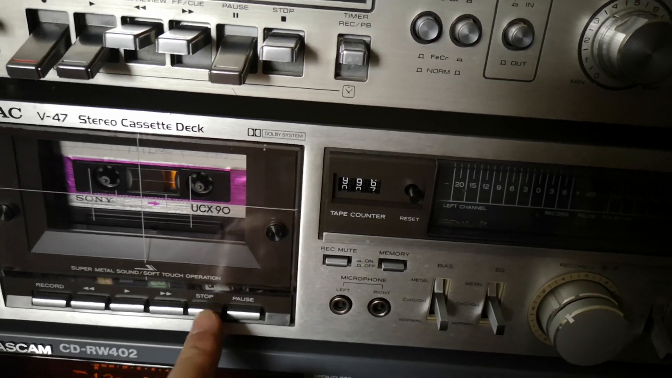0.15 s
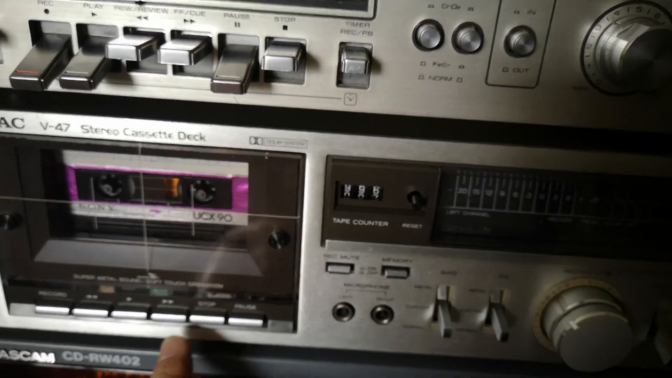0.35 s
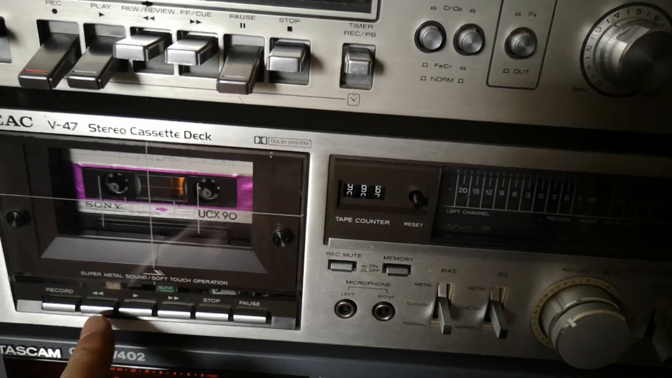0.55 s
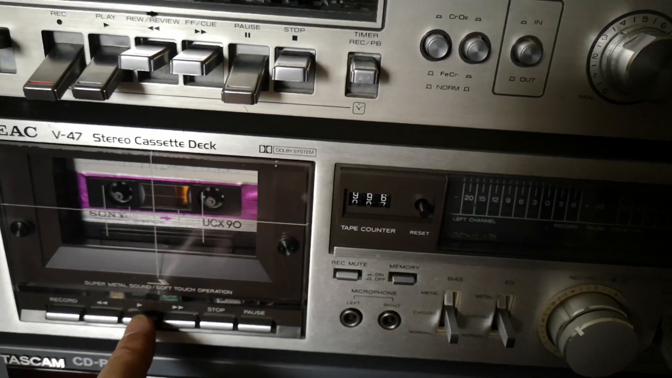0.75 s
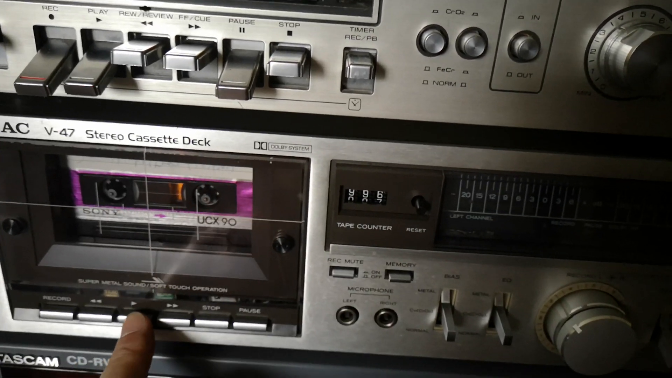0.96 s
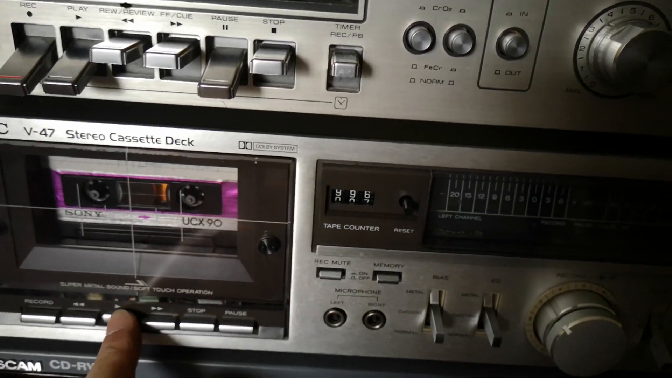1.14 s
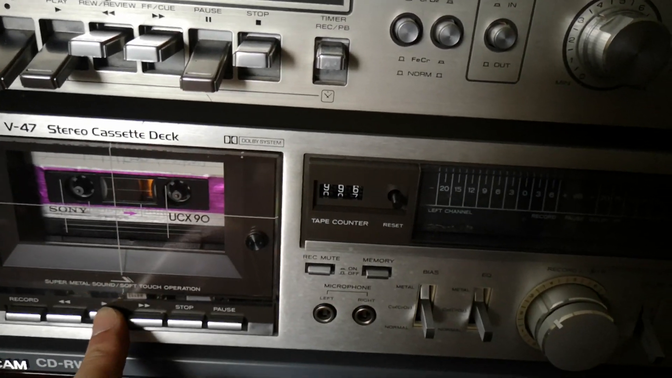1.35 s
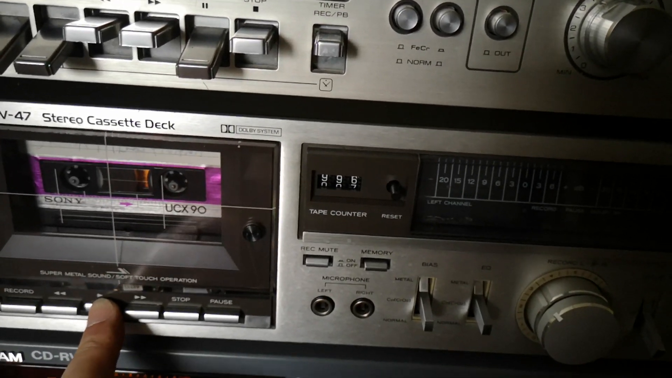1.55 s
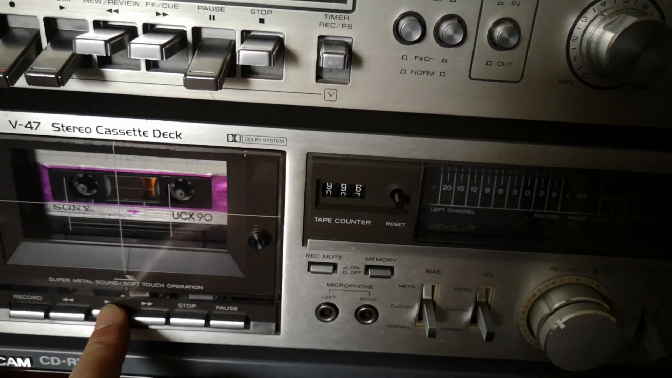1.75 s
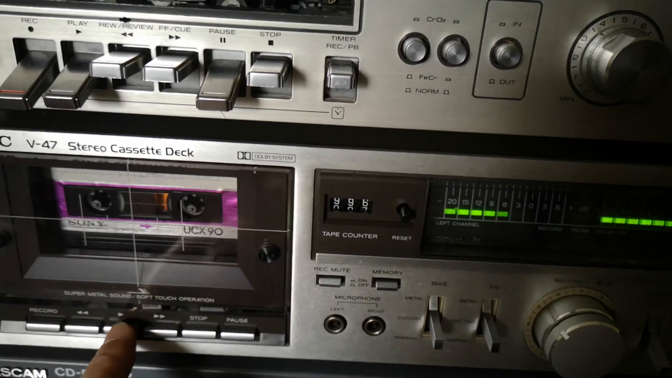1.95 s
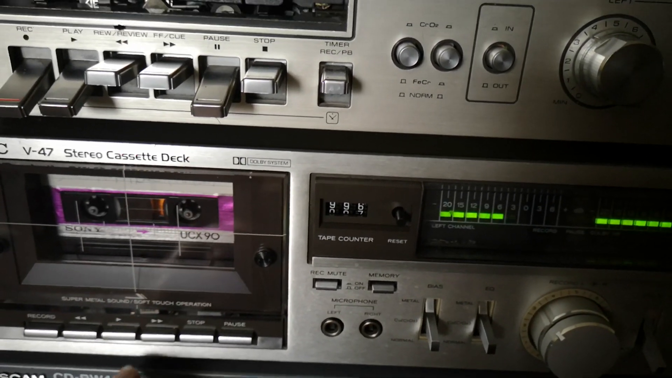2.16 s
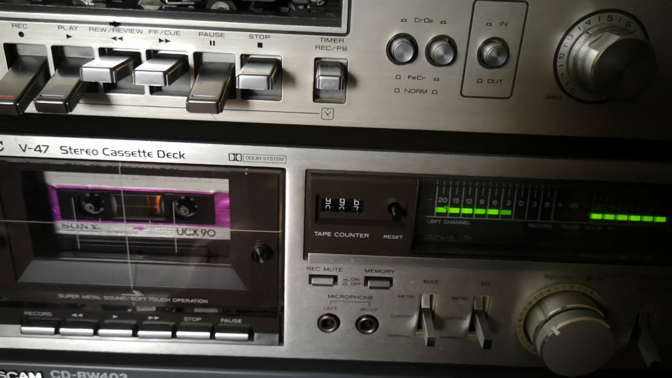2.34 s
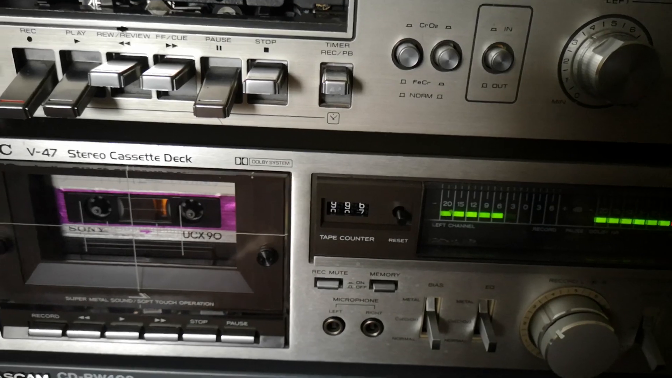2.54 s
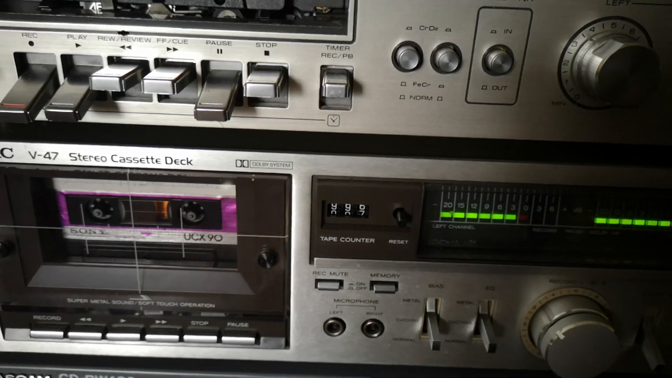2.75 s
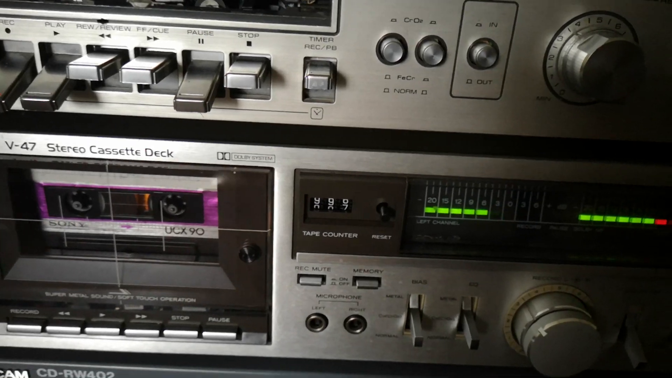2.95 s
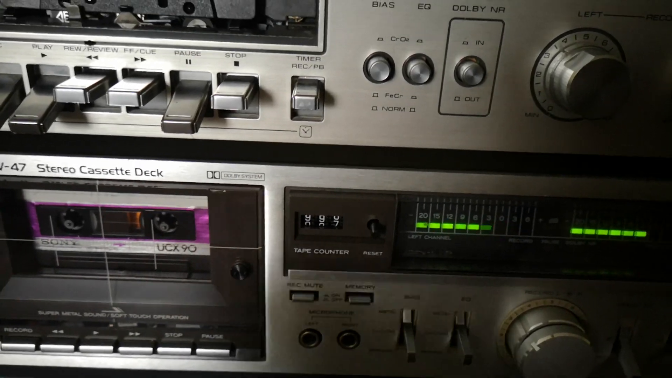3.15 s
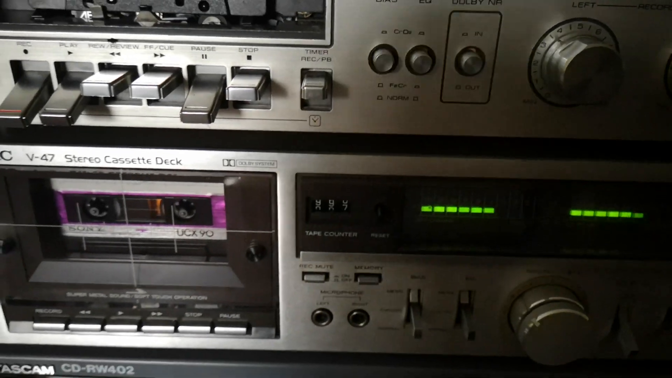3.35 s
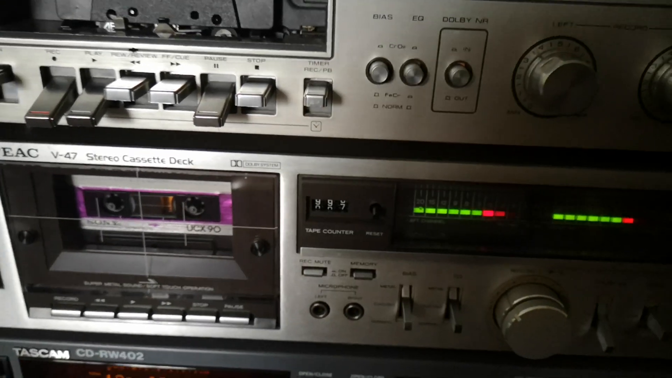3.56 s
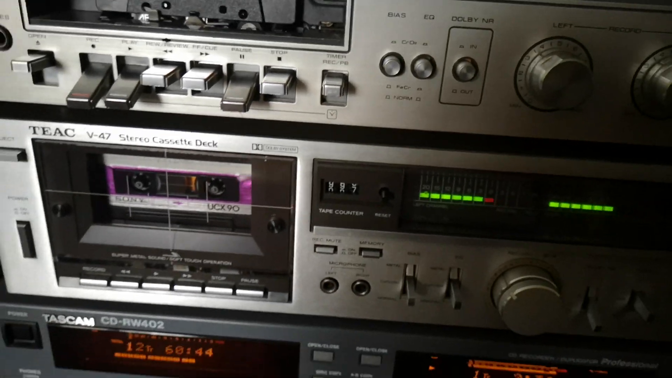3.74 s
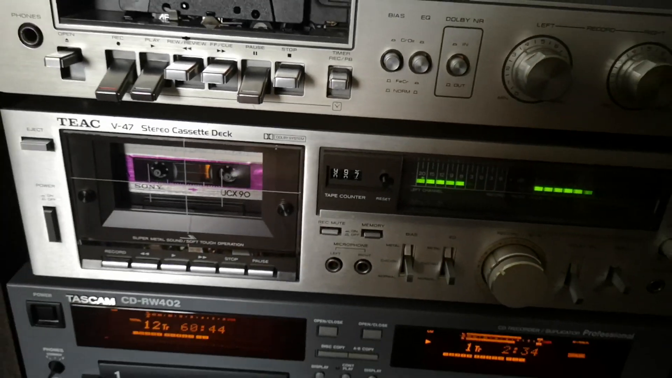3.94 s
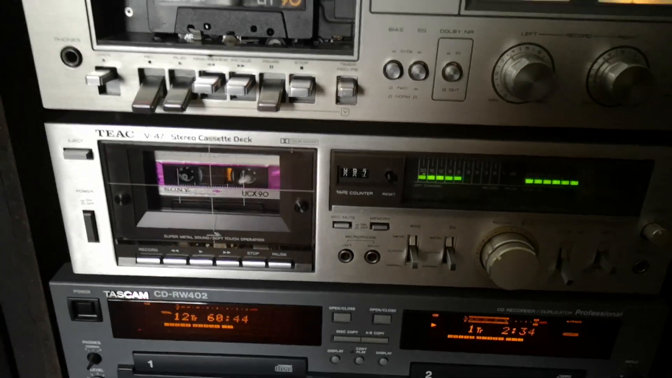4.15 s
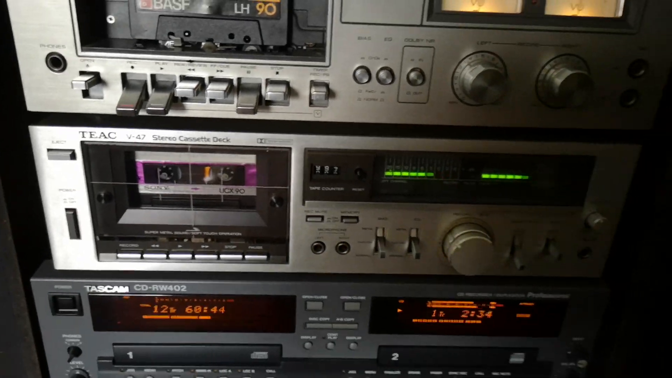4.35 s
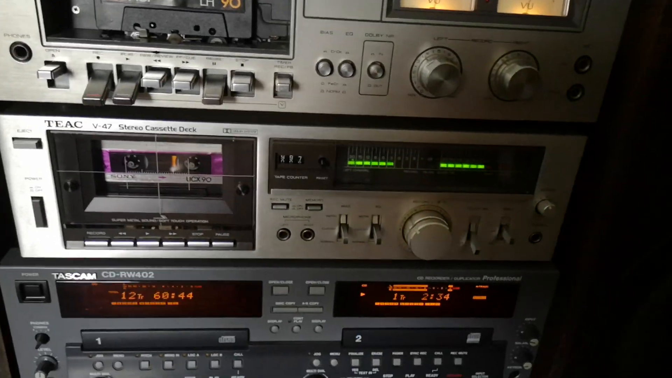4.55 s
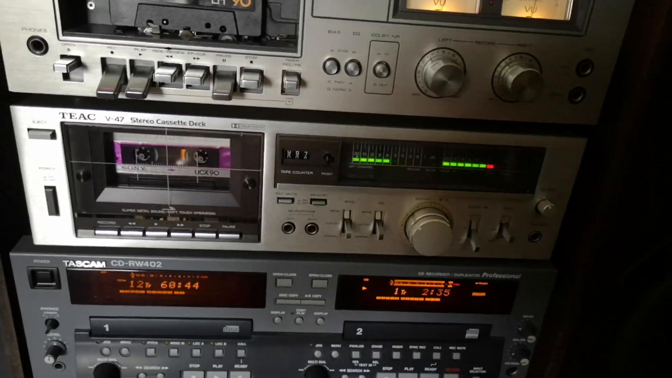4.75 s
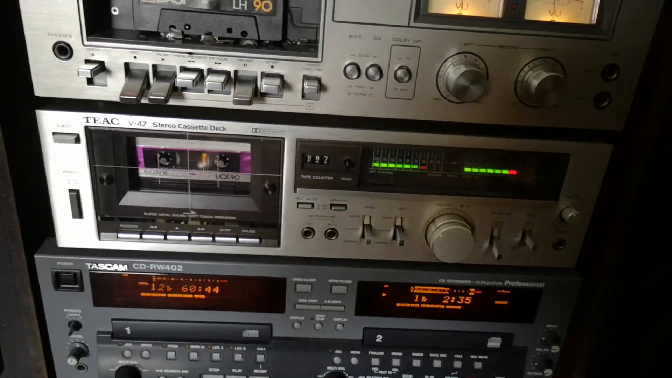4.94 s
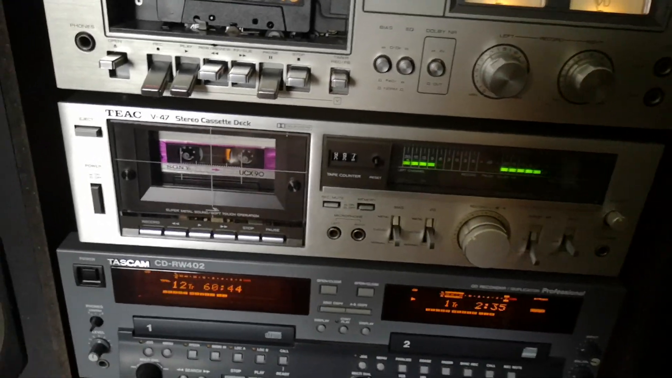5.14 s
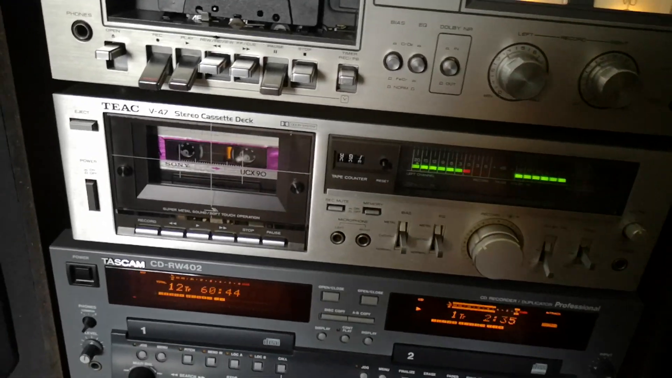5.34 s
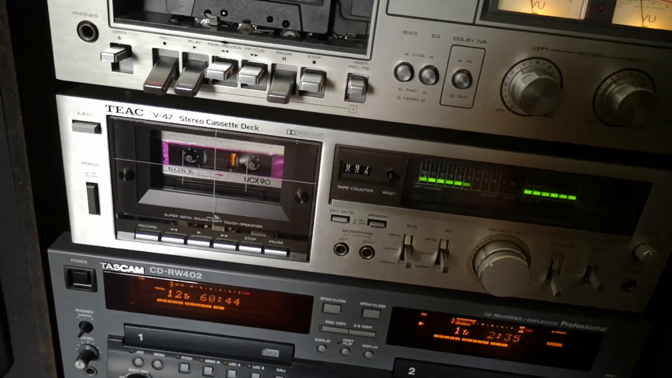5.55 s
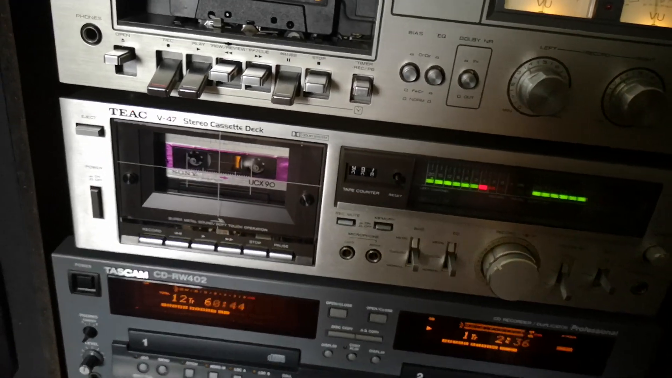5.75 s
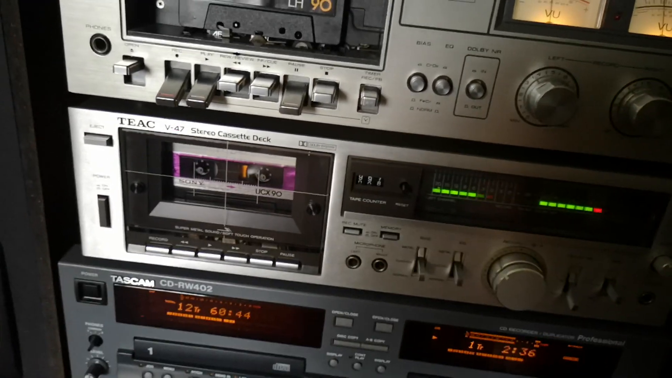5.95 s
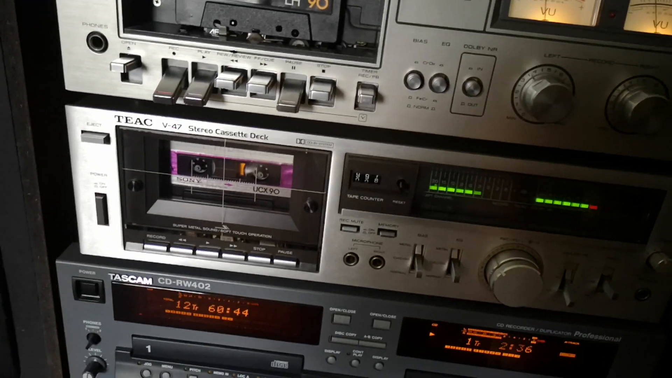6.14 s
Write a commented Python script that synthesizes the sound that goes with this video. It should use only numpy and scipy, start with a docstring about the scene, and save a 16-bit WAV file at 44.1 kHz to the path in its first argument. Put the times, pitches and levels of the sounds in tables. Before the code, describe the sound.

Keys on a cassette deck clack and thump up close, with brief tape winding, then light ticks over faint hum and hiss.

```python
"""Cassette deck keys, up close

Stop, wind and play are pressed. In each stroke a latch lets go and a lever rattles along its travel
and hits its stop: the front clacks, the cabinet thumps. The reels whirr while the tape winds.
Mains hum and soft hiss fill a small quiet room; later a hand-held camera's case ticks in the hand."""
import sys
import numpy as np
from scipy import signal
from scipy.fft import rfft, irfft
from scipy.io import wavfile

SR = 44100
rng = np.random.default_rng(int(sys.argv[2]) if len(sys.argv) > 2 else 0)


def master(y):
    """Save y as 16-bit WAV."""
    cut = np.clip(np.atleast_2d(y).T, -1, 1)
    pcm = np.round(cut * 32767)  # scale
    wavfile.write(sys.argv[1], SR, pcm.astype(np.int16))


N = 273243


def amp(db):
    """Decibels to gain."""
    return 10 ** (np.asarray(db) / 20)


def unit_rms(x):
    """Scales to rms 1."""
    return x / np.sqrt(np.mean(x ** 2) + 1e-20)


def curve_at(points, hz):
    """Reads a curve on a log-frequency axis."""
    point_hz, value = np.transpose(points)
    return np.interp(np.log(hz + 1), np.log(point_hz + 1), value)


def add(mix, start_s, sound):
    """Lays a sound into the stereo mix."""
    part = mix[:, round(start_s * SR):][:, :sound.shape[-1]]
    part += sound[..., :part.shape[-1]]


def pan(pan_db):
    """Stereo gains for a left minus right level."""
    return amp([[pan_db / 2], [-pan_db / 2]])


def bell(hz, centre_hz, octaves):
    """A rounded hump in dB with straight skirts: the band that one contact excites."""
    return 12 * (1 - np.sqrt(1 + (np.log2((hz + 1) / centre_hz) / octaves) ** 2))


def colour(x, curve_db, size=2048):
    """Minimum-phase EQ of unit energy; the curve is a function of Hz."""
    log_gain = np.log(amp(curve_db(abs(np.fft.fftfreq(size, 1 / SR)))))
    taps = np.fft.ifft(np.exp(np.conj(signal.hilbert(log_gain)))).real
    return signal.oaconvolve(x, taps[None] / np.linalg.norm(taps), axes=1)[:, :x.shape[1]]


def decay(t, t60):
    """Falls by 60 dB in t60 seconds."""
    return np.exp(-np.log(1000) * t / t60)


def rattle(t, t60, likeness):
    """A contact's dense, dying chatter, partly shared by left and right."""
    shared, *own = rng.choice([-1., 1.], (3, len(t)))
    return (np.sqrt(likeness) * shared + np.sqrt(1 - likeness) * np.array(own)) * decay(t, t60)


# Decay of the small room: band_hz, t60_s
ROOM_DECAY = [(100, .35), (500, 0.28), (1000, 0.18), (1800, 0.19), (3000, 0.18), (6000, 0.19), (9000, 0.17),
              (15000, 0.21)]
def room(x, build_s=0.0023, density=.12):
    """Sparse reflections that build up quickly and die band by band."""
    t = np.arange(SR // 2) / SR
    echoes = rng.choice([-1., 1.], (2, len(t))) * (rng.random((2, len(t))) < density)
    echoes *= 1 - np.exp(-(t / build_s) ** 2)
    hz, frame_s, bands = signal.stft(echoes, SR, nperseg=256)
    bands = bands * decay(frame_s, curve_at(ROOM_DECAY, hz)[:, None])
    tail = signal.istft(bands, SR, nperseg=256)[1]
    return signal.fftconvolve(x, tail / np.linalg.norm(tail[0]), axes=1)[:, :N]


# Tone of the room hiss: band_hz, gain_db
HISS_EQ = [(20, -4.5), (45, -11), (85, -15), (170, -16), (270, -22), (400, -27), (630, -31.5), (950, -27.5),
           (1900, -24.5), (4400, -37), (7000, -39.5), (8800, -44), (11500, -44), (15800, -47)]
# Stereo image of the hiss: band_hz, left_right_correlation
HISS_LIKENESS = [(30, 0.88), (200, 0.93), (500, 0), (1000, 0.12), (3000, 0), (15000, 0)]
def room_hiss(level_db=-65):
    """A steady bed of noise, centred in the lows and wide above."""
    hz = np.fft.rfftfreq(N, 1 / SR)
    left, other = rfft(rng.standard_normal((2, N)))
    likeness = curve_at(HISS_LIKENESS, hz)
    right = likeness * left + np.sqrt(1 - likeness ** 2) * other
    hiss = irfft(np.array([left, right]) * amp(curve_at(HISS_EQ, hz)), N)
    return amp(level_db) * unit_rms(hiss)


# Tones of the hum: pitch_hz, gain_db
HUM_TONES = [(120.1, 0), (238, -14.5), (180, -21.5), (948, -23), (1287, -23.5), (5765, -34.5)]
# Level ride of the hum as the camera moves about: time_s, level_db
HUM_RIDE = [(0.0, -62.5), (0.83, -63.5), (0.98, -65), (3.47, -64.5), (5.44, -68), (5.59, -64.5),
            (6.2, -67.5)]
def mains_hum():
    """A transformer hums on steady pitches while its level drifts."""
    t = np.arange(N) / SR
    hum = sum(amp(db) * np.sqrt(2) * np.sin(2 * np.pi * (hz * t + rng.random())) for hz, db in HUM_TONES)
    return hum * amp(np.interp(t, *np.transpose(HUM_RIDE)))


# Dry ticks of the camera's case: start_s, energy_db, centre_hz, width_octaves, t60_s, pan_db
CASE_TICKS = [(3.0231, -39, 2400, .6, 0.0095, -0.5), (3.822, -18.5, 1680, 0.42, 0.0039, 16.5),
              (3.822, -33, 4800, 0.5, 0.0032, 16), (4.0397, -38, 7240, 0.45, 0.017, 26),
              (4.0432, -33.5, 770, 0.38, 0.011, 16.5), (4.0451, -30, 2410, 0.61, 0.0071, 20),
              (4.309, -37, 10000, 1.5, 0.0032, -7), (4.371, -40.5, 3500, 1, .0077, 19),
              (4.5015, -26.5, 1104, 1.01, 0.0096, -9), (4.5029, -38.5, 4400, 0.19, .0027, 17),
              (4.6146, -26.5, 3550, 0.9, 0.0055, 17), (4.8504, -38.5, 2300, .36, 0.0097, -9.5)]
def case_ticks(crack=0.33):
    """One clean crack, then a little chatter; the small stiff shell gives out little bass."""
    t, out = np.arange(SR // 4) / SR, np.zeros((2, N))
    for start_s, db, centre_hz, octaves, t60, pan_db in CASE_TICKS:
        chatter = rattle(t, t60, likeness=0.42)
        slip = crack * (t == 0) + chatter / np.linalg.norm(chatter[0])
        tick = colour(slip, lambda hz: bell(hz, centre_hz, octaves)
                      - 10 * np.log10(1 + (950 / (hz + 100)) ** 10))  # low cut
        add(out, start_s, amp(db) * pan(pan_db) * tick / np.linalg.norm(tick, axis=1, keepdims=True))
    return out


# Faint rubs on the case, and a soft reel squeak swelling at the end:
# start_s, length_s, level_db, centre_hz
RUBS_AND_SQUEAK = [(3.686, 0.029, -57, 1900), (4.01, .14, -67.5, 1700), (4.122, 0.09, -74.5, 5540),
                   (4.318, 0.1, -74, 7000), (5.939, 0.46, -73.5, 2200)]
def rubs_and_squeak(grains_per_s=1500, octaves=.62, pan_db=9):
    """Faint, grainy friction that swells and fades."""
    out = np.zeros((2, N))
    for start_s, length_s, db, centre_hz in RUBS_AND_SQUEAK:
        grains = rng.standard_normal((2, SR)) * (rng.random(SR) < grains_per_s / SR)
        friction = unit_rms(colour(grains, lambda hz: bell(hz, centre_hz, octaves)))
        swell = np.hanning(round(length_s * SR))
        add(out, start_s, amp(db) * pan(pan_db) * swell * friction[:, :len(swell)])
    return out


# Soft bumps of the hand on the camera: start_s, level_db, pitch_hz
HAND_BUMPS = [(3.48, -55.5, 30), (3.822, -51.5, 38), (3.904, -50.5, 27.3), (4.188, -53.5, 202.3),
              (4.608, -50, 60), (5.55, -55.5, 32)]
def small_noises(room_db=-19, lag_samples=26):
    """Ticks, rubs and the squeak with a touch of room, plus dull bumps through the camera's case."""
    t = np.arange(SR // 4) / SR
    out = case_ticks() + rubs_and_squeak()
    out[1] = np.roll(out[1], lag_samples)  # these reach the left microphone first
    out += amp(room_db) * room(out)
    for start_s, db, hz in HAND_BUMPS:
        cycles = hz * t
        swell = 2 * cycles * np.exp(1 - 2 * cycles)
        add(out, start_s, amp(db) * swell * np.sin(2 * np.pi * cycles))
    return out


# Tone of the reel motor: band_hz, gain_db
MOTOR_EQ = [(40, -0.5), (120, 4.5), (210, 12.5), (270, 6), (360, -7.5), (600, -17.5), (900, -6),
            (2000, -20), (4000, -36), (12000, -42.5)]
# Runs of winding tape: start_s, stop_s, motor_db, whirr_db
WIND_RUNS = [(-.1, 0.255, -64.5, -70), (1.167, 1.63, -61.5, -86)]
def winding(spin_up_s=.02, coast_s=0.037):
    """The reel motor rumbles and the tape whirrs: both spin up quickly and coast to rest."""
    t, out = np.arange(N) / SR, np.zeros((2, N))
    motor = colour(rattle(t, np.inf, likeness=0.71), lambda hz: curve_at(MOTOR_EQ, hz))
    whirr = colour(rattle(t, np.inf, likeness=0.15), lambda hz: bell(hz, centre_hz=1900, octaves=1))
    for start_s, stop_s, motor_db, whirr_db in WIND_RUNS:
        spin_up = 1 - np.exp(-np.maximum(t - start_s, 0) / spin_up_s)
        coast = np.exp(-np.maximum(t - stop_s, 0) / coast_s)
        out += spin_up * coast * (amp(motor_db) * motor + amp(whirr_db) * whirr)
    return out


SEAT_S = .0027  # from the lever meeting its stop until it seats with a clack
# Small knocks of the winding reels: start_s, snap_db, clack_db
KNOCKS = [(1.3429, -58.5, -59), (1.4376, -64.5, -56.5)]
# Key strokes: start_s, travel_s, touch_db, release_snap_db, rattle_db, stop_snap_db,
# clack_db, clack_centre_hz, thump_db, thump_centre_hz
KEY_STROKES = [(0.179, 0.0044, -47, -27, -48, -18, -17, 2140, -30, 107.5),
               (0.2444, .0262, -60, -39.5, -40, -41.5, -35, 2550, -45, 110),
               (0.3555, 0.017, -61.5, -22.5, -25, -20.5, -17, 1180, -29, 173),
               (1.1611, .0212, -60.5, -32.5, -44, -36.5, -39.5, 925, -47, 150),
               (1.5221, .0242, -72, -63.5, -49.5, -37.5, -38, 1124, -46, 171),
               (1.6240, 0.0029, -70, -57, -49, -29, -28, 1450, -30.5, 76),
               (2.0420, 0.0089, -47.5, -33, -35, -23, -19.5, 990, -32, 206)]
def contacts(slack_s=.008, rebound_s=.007, rebound_db=-17.5, knock_hz=1280):
    """Every hit in the mechanism: start_s, clack_db, centre_hz, snap_db, clack_delay_s."""
    for start_s, travel_s, touch_db, release_db, rattle_db, stop_db, clack_db, hz, _, _ in KEY_STROKES:
        stop_s = start_s + travel_s
        yield start_s - slack_s, touch_db, hz, touch_db - 6, 0  # the key takes up its slack
        yield start_s, rattle_db, hz * 1.1, release_db, 0  # the light latch lets go, a little higher
        yield start_s + 0.55 * travel_s, rattle_db, hz, release_db - 9, 0  # the lever rattles midway
        yield stop_s, clack_db, hz, stop_db, SEAT_S  # hits its stop
        yield stop_s + rebound_s, clack_db + rebound_db, hz, stop_db + rebound_db, 0  # bounces once
    for start_s, snap_db, clack_db in KNOCKS:
        yield start_s, clack_db, knock_hz, snap_db, 0


# Low modes of the cabinet: pitch_hz, gain_db, t60_s
CABINET_MODES = [(60, -3.5, .35), (70, -3.5, 0.29), (102.7, -2.5, 0.26), (112.3, -8.5, 0.16), (162, -3, .2),
                 (187, 6, .33), (224.4, -6, 0.22), (256, -17, 0.17)]
def cabinet_thumps(rise_s=0.034, shudder_db=-9, octaves=0.81):
    """Low modes swell after each lever seats and boom on, while loose parts shudder."""
    t, out = np.arange(SR) / SR, np.zeros((2, N))
    hz, db, t60 = np.transpose(CABINET_MODES)[:, :, None]
    for start_s, travel_s, *_, thump_db, centre_hz in KEY_STROKES:
        modes = amp(db + bell(hz, centre_hz, octaves)) * decay(t, t60) * np.sin(2 * np.pi * hz * t)
        chatter = rattle(t, t60=0.24, likeness=0.49)
        shudder = colour(chatter, lambda f: bell(f, centre_hz=225, octaves=0.75))
        boom = (modes.sum(0) + amp(shudder_db) * shudder) * (1 - np.exp(-t / rise_s))
        add(out, start_s + travel_s + SEAT_S, amp(thump_db) * boom)
    return out


# Ring of the deck's front and chassis: pitch_hz, gain_db
FRONT_MODES = [(355, -7), (505, -3), (689, -3.5), (772, 1), (800, -11), (940, -5), (980, 1), (1190, -3.5),
               (1363, -2.5), (1480, -6.5), (1545, -6.5), (1780, -10.5), (1893, -7), (1997, -8.5),
               (2150, -9), (2456, -7.5), (2649, -9), (4702, -4.5), (5012, -6), (5640, -8)]
# Faint, lingering ring of the sheet-metal cover: pitch_hz, gain_db
COVER_MODES = [(1530, 0.5), (1707, -4.5), (1900, -2), (2010, -3.5), (2075, -1)]
# Tone of the bright latch snap: band_hz, gain_db
SNAP_EQ = [(200, -17), (1000, -8), (2300, -0.5), (3400, -0.5), (4900, 4), (6500, -3), (7900, -2),
           (9800, -6), (11500, -6), (15000, -17.5)]
# Tone of the dull clack: band_hz, gain_db
CLACK_EQ = [(100, -8.5), (300, -11.5), (420, -15), (700, -4.5), (950, 1), (1100, -5.5), (1400, -6),
            (2000, 6), (2500, 0), (3200, -8), (6000, -16), (15000, -26.5)]
# Stereo lean of the deck: band_hz, left_minus_right_db
DECK_PAN = [(200, 2.5), (600, -1.5), (950, -1), (1600, -6), (2400, 3.5), (3400, 6), (5000, -1), (7500, 5),
            (9500, 0.5), (11500, -9), (15000, -8)]
def key_clacks(clack_db=-2, front_db=-12, cover_db=-35.5, room_db=-8,
               crack=6.5, octaves=0.79, lag_samples=5):
    """Each hit gives a bright snap, a dense clack and the ring of the front and the cover."""
    t, out = np.arange(SR // 2) / SR, np.zeros((2, N))
    mode_hz, mode_db = np.transpose(FRONT_MODES)[:, :, None]
    polarity = (-1) ** np.arange(len(FRONT_MODES))[:, None]  # neighbouring modes push the air oppositely
    mic_phase = rng.uniform(-.5, 0.65, (2, len(FRONT_MODES), 1))
    rings = polarity * decay(t, t60=0.12) * np.sin(2 * np.pi * mode_hz * t + mic_phase)
    cover = decay(t, t60=0.46) * sum(amp(db) * np.sin(2 * np.pi * hz * t) for hz, db in COVER_MODES)
    for start_s, hit_db, centre_hz, snap_db, delay_s in contacts():
        # the latch slides off its edge, then flies
        scrape = rattle(t, t60=0.038, likeness=0.21) * (1 - np.exp(-t / 0.0004))
        snap = colour(scrape, lambda hz: curve_at(SNAP_EQ, hz))
        strike = crack * (t == 0) + rattle(t, t60=0.064, likeness=0.2)  # a hard stop, then parts chatter
        clack = colour(strike, lambda hz: curve_at(CLACK_EQ, hz) + bell(hz, centre_hz, octaves))
        front = (amp(mode_db + bell(mode_hz, centre_hz, octaves)) * rings).sum(1)
        body = amp(clack_db) * clack + amp(front_db) * front + amp(cover_db) * cover
        add(out, start_s, amp(snap_db) * snap)
        add(out, start_s + delay_s, amp(hit_db) * body)
    out[1] = np.roll(out[1], lag_samples)  # the keys are nearer the left microphone
    out += amp(room_db) * room(out)
    pan_db = curve_at(DECK_PAN, np.fft.rfftfreq(N, 1 / SR))
    return irfft(rfft(out) * amp([pan_db / 2, -pan_db / 2]), N)


def scene():
    """The deck, the hand and the room together."""
    return key_clacks() + cabinet_thumps() + winding() + small_noises() + room_hiss() + mains_hum()


def record(dry):
    """A steep low-pass trims the very top."""
    low_pass = signal.firwin(401, cutoff=15700, window=("kaiser", 9), fs=SR)
    return signal.oaconvolve(dry, low_pass[None], "same")


dry = scene()
out = record(dry)
master(out)
```